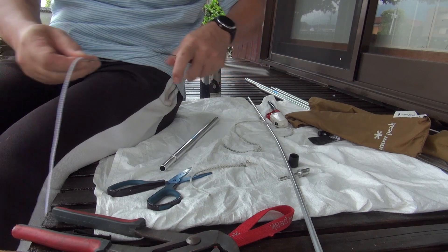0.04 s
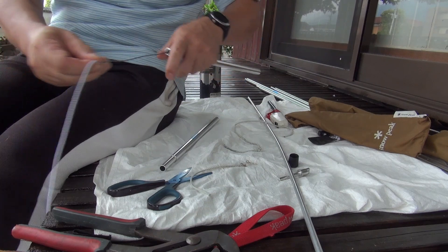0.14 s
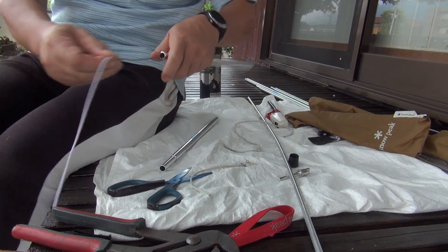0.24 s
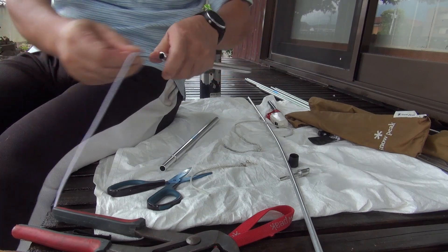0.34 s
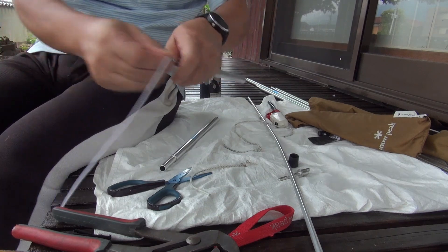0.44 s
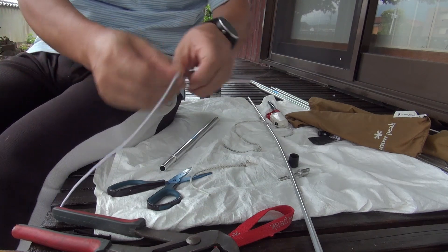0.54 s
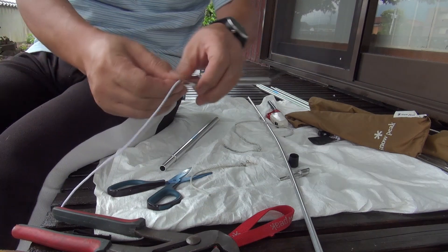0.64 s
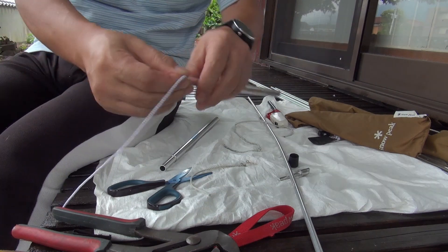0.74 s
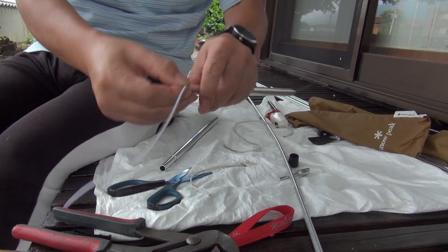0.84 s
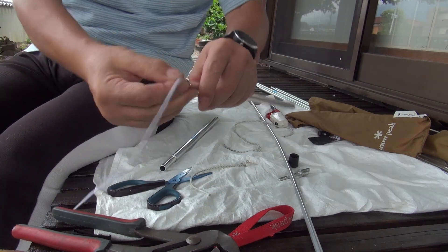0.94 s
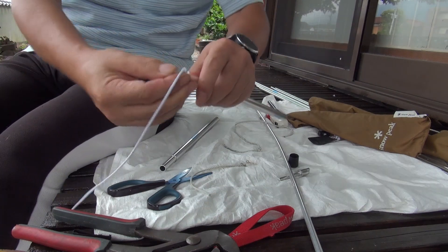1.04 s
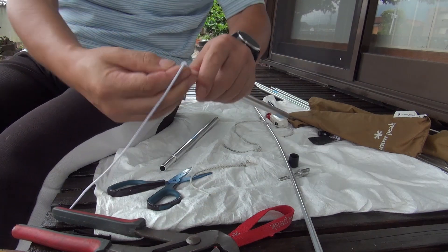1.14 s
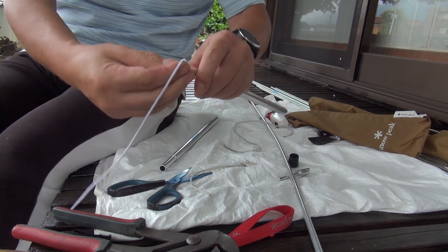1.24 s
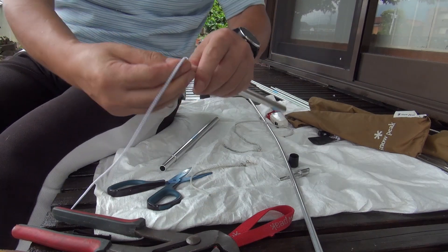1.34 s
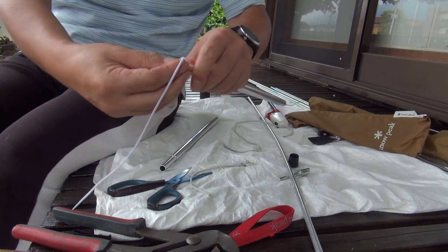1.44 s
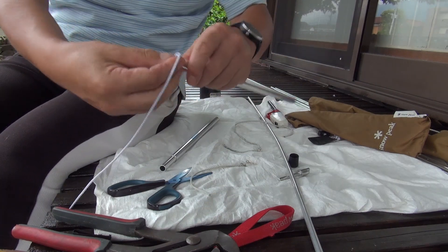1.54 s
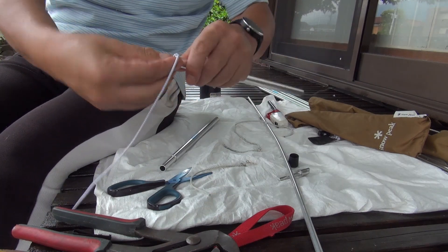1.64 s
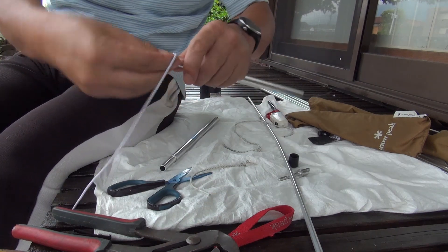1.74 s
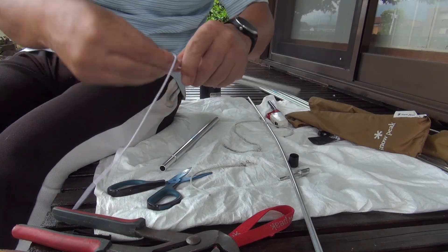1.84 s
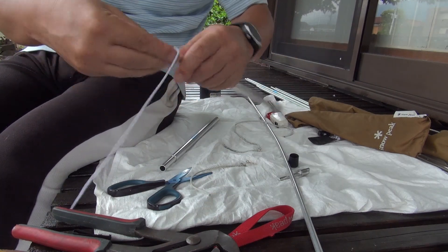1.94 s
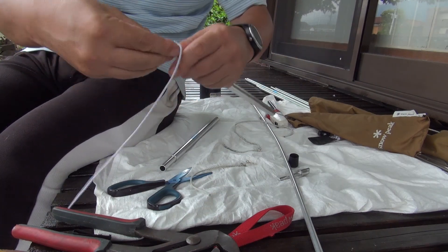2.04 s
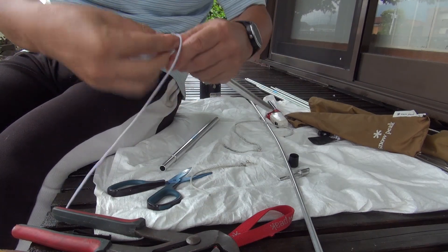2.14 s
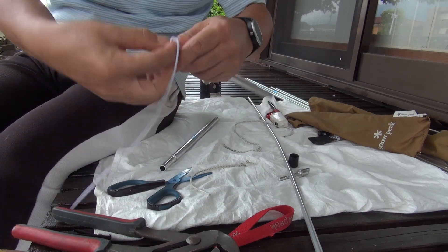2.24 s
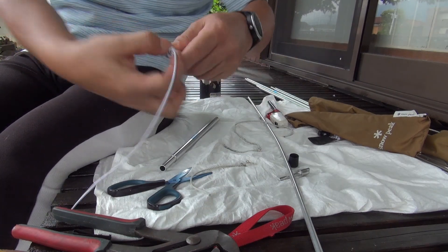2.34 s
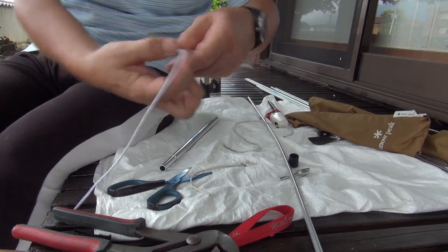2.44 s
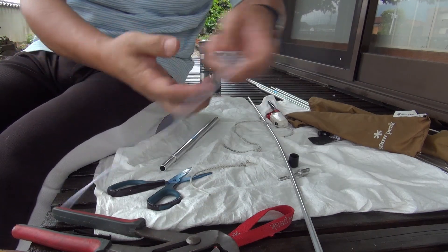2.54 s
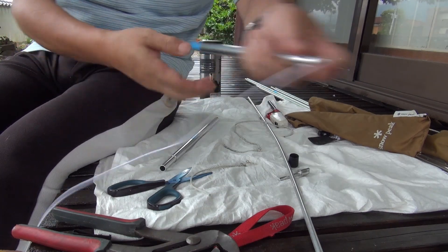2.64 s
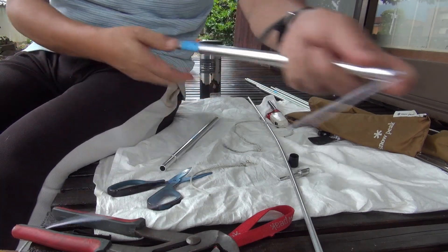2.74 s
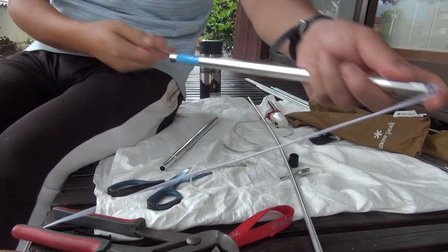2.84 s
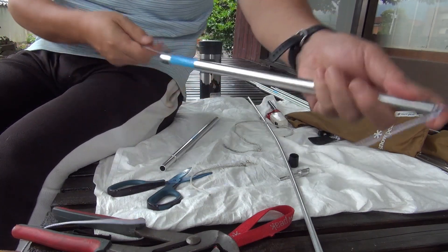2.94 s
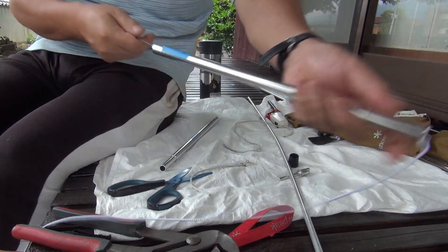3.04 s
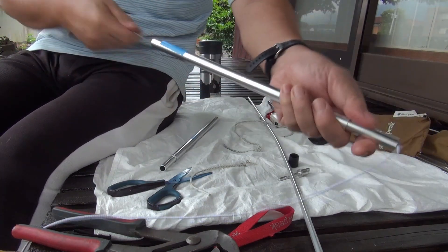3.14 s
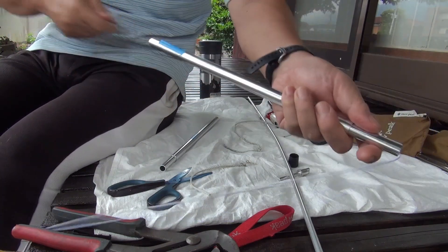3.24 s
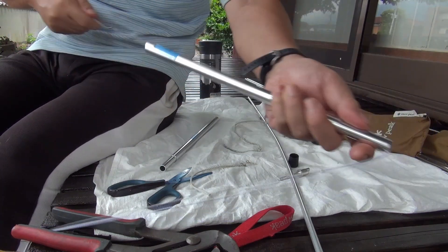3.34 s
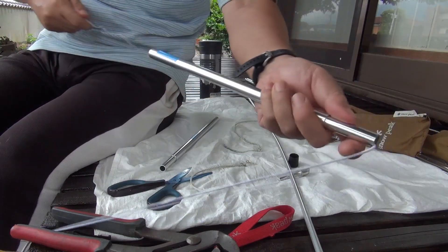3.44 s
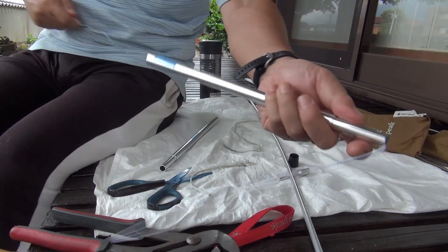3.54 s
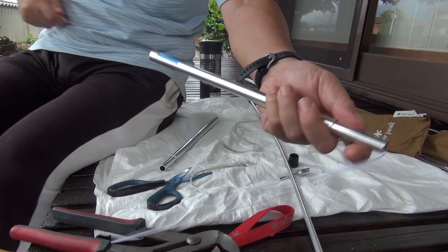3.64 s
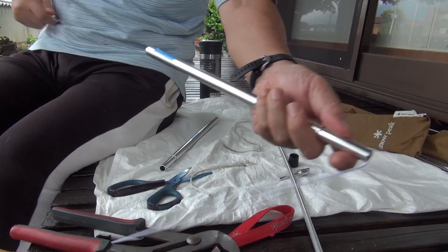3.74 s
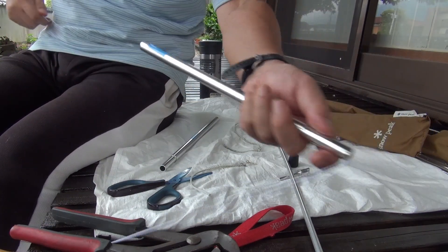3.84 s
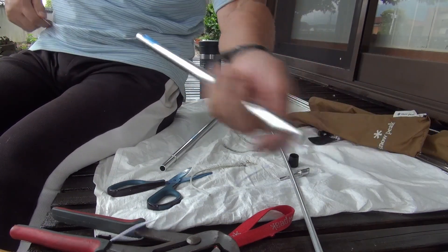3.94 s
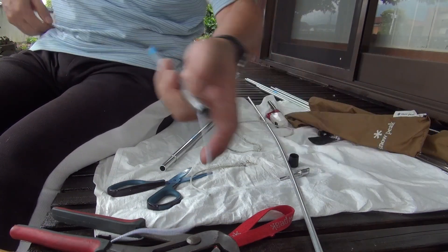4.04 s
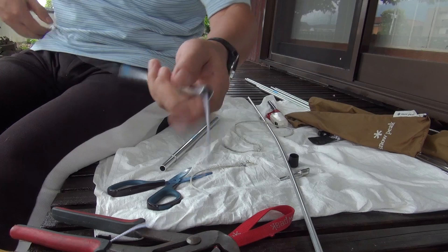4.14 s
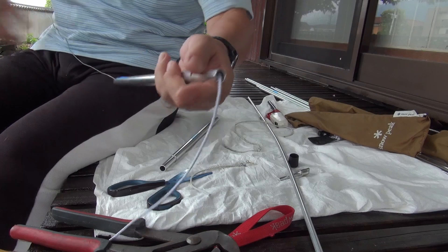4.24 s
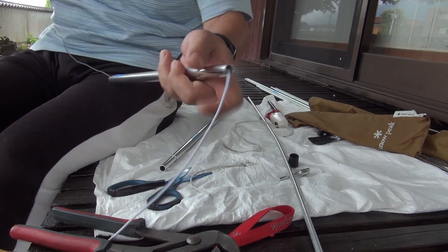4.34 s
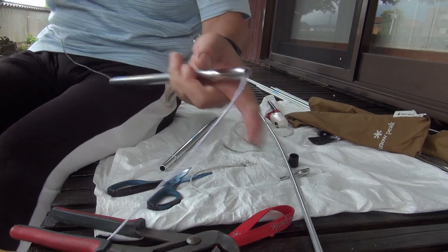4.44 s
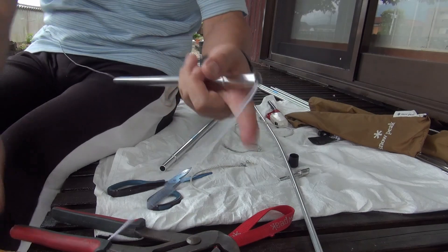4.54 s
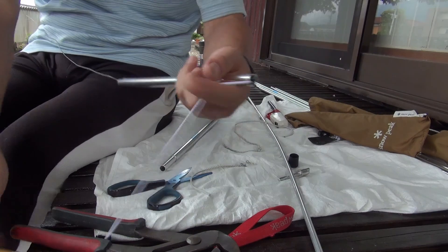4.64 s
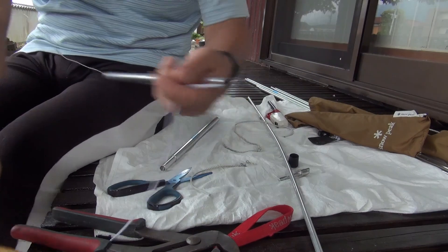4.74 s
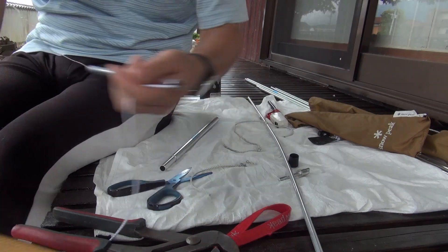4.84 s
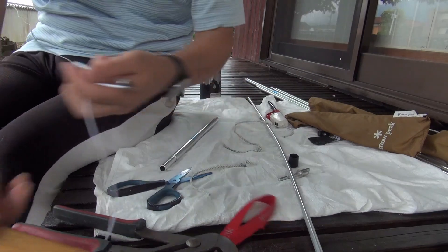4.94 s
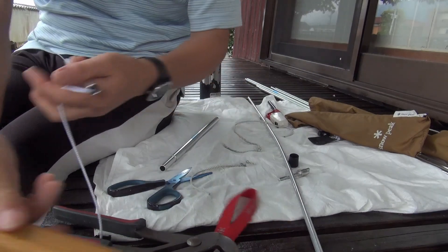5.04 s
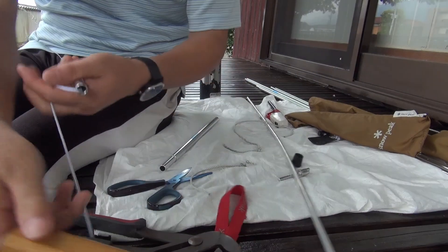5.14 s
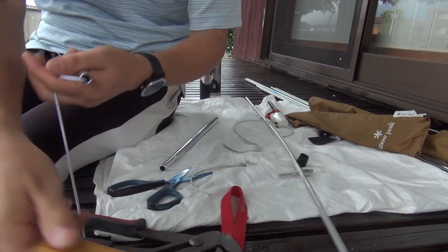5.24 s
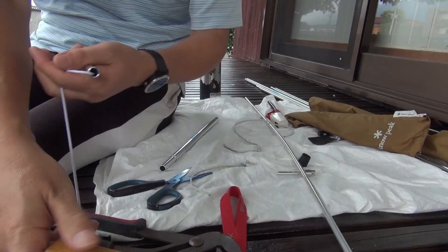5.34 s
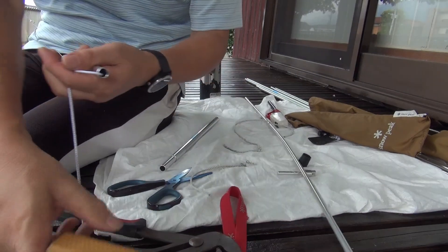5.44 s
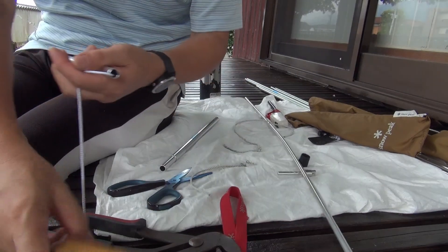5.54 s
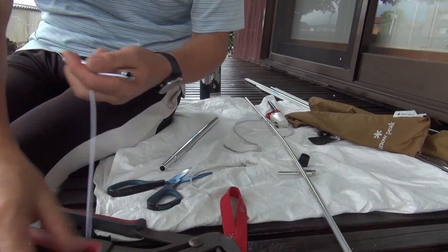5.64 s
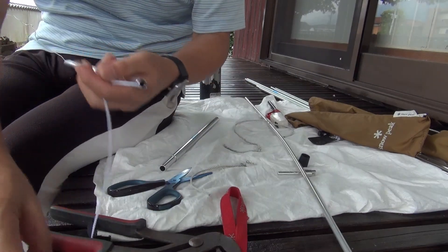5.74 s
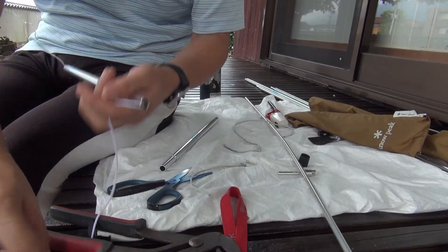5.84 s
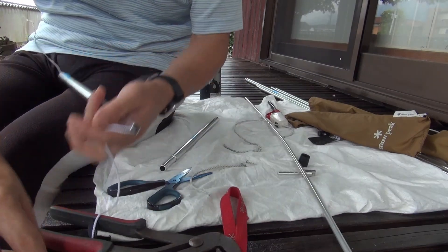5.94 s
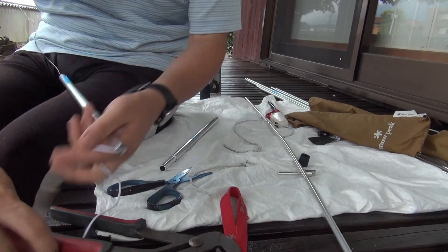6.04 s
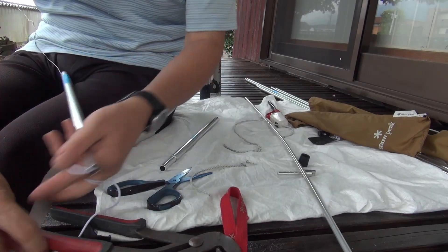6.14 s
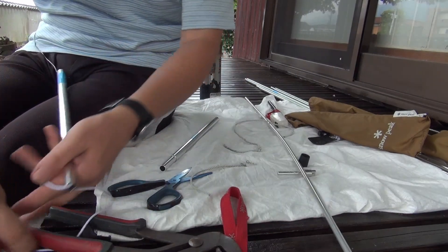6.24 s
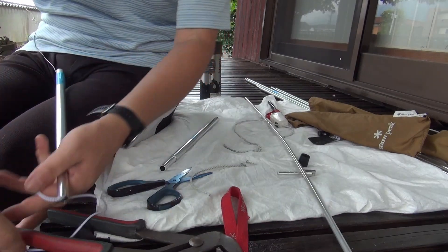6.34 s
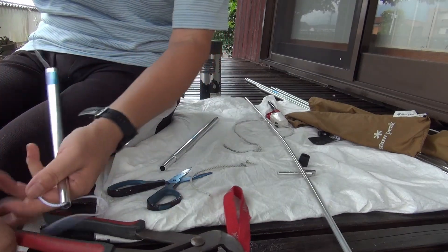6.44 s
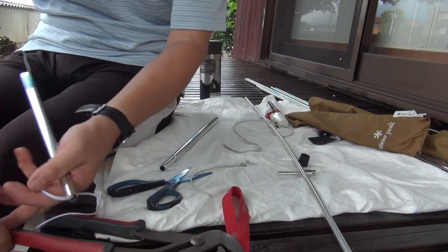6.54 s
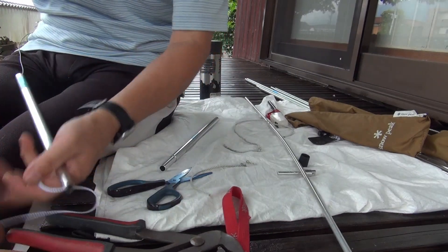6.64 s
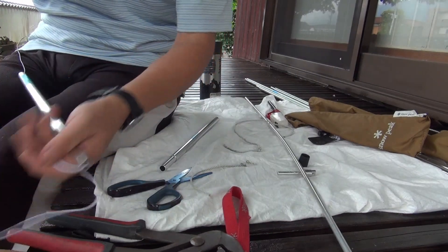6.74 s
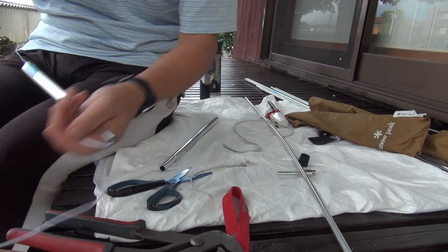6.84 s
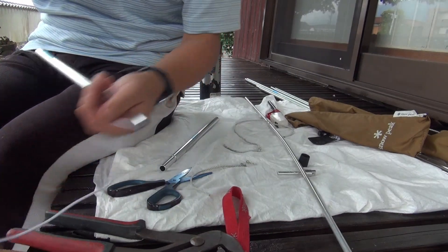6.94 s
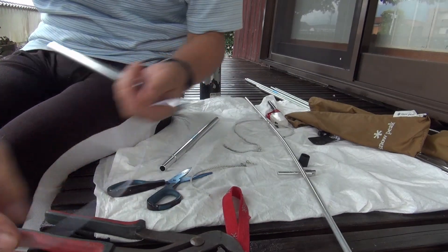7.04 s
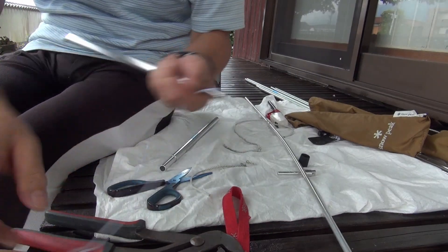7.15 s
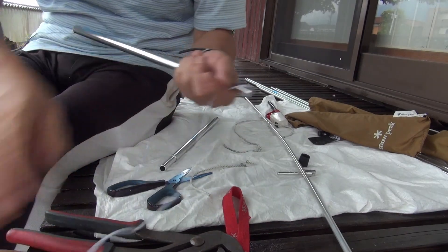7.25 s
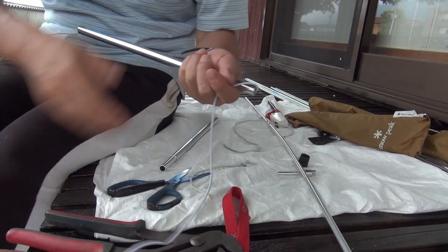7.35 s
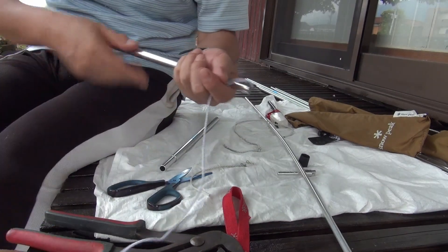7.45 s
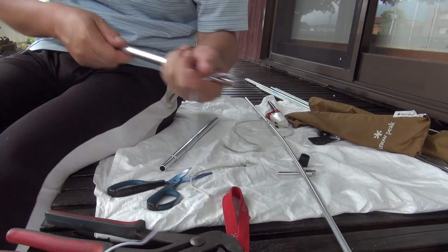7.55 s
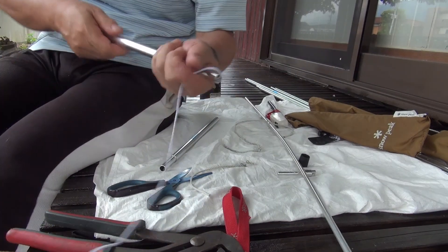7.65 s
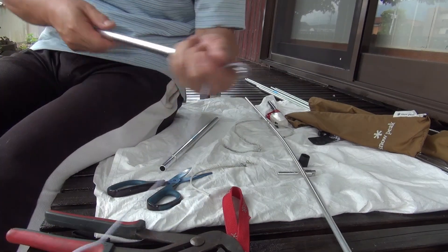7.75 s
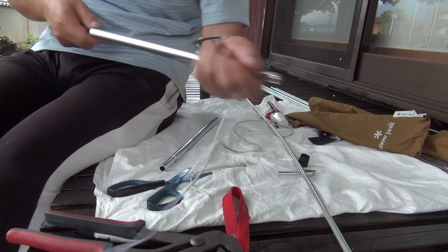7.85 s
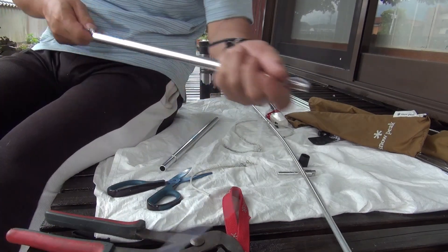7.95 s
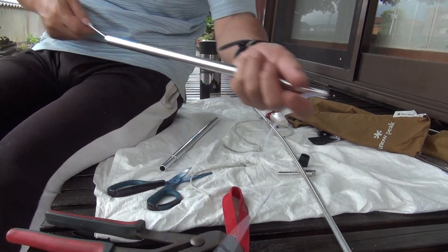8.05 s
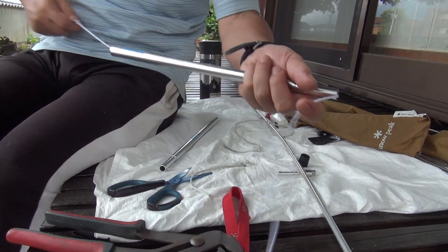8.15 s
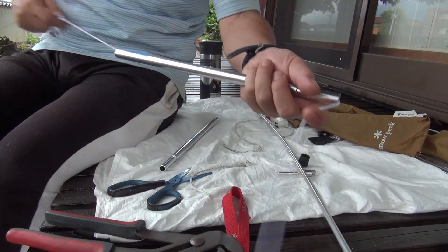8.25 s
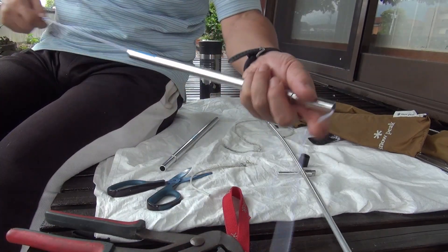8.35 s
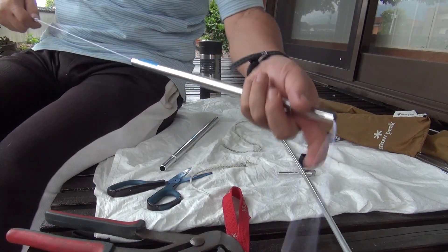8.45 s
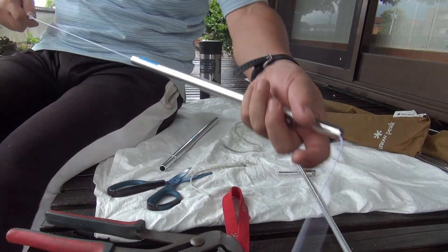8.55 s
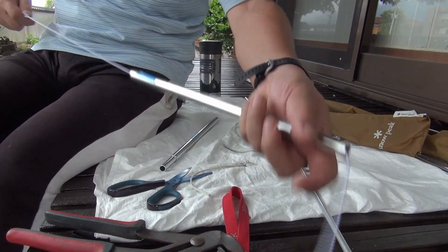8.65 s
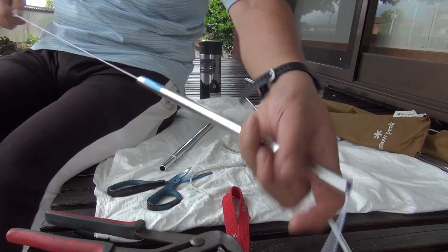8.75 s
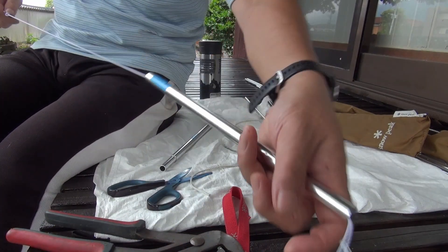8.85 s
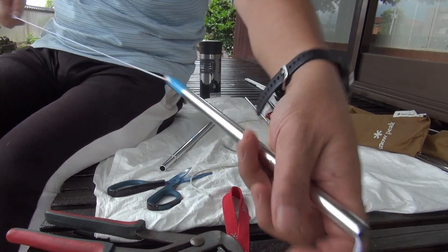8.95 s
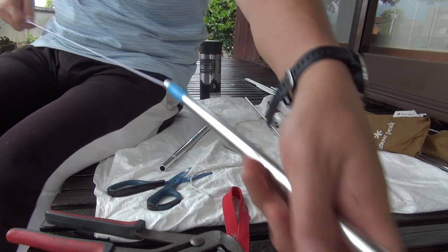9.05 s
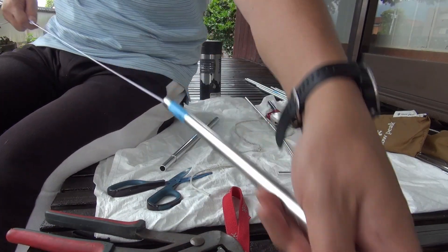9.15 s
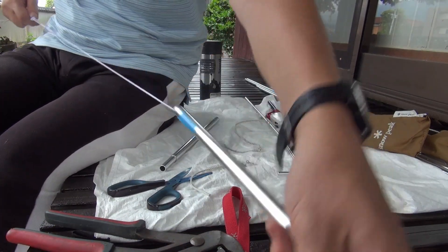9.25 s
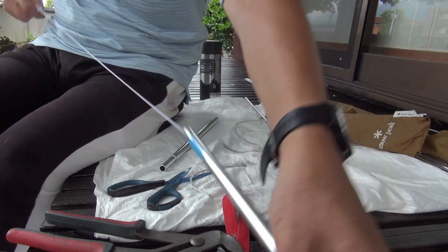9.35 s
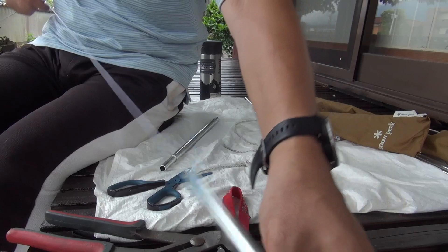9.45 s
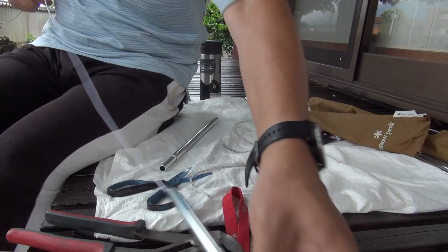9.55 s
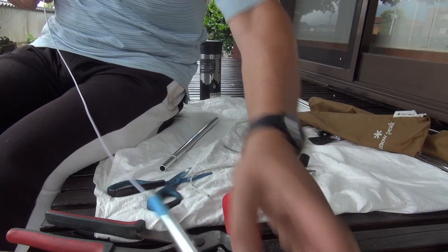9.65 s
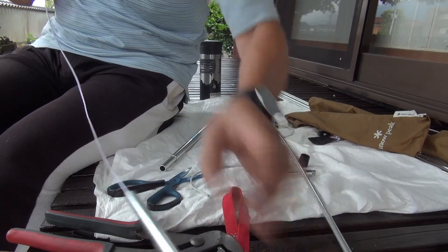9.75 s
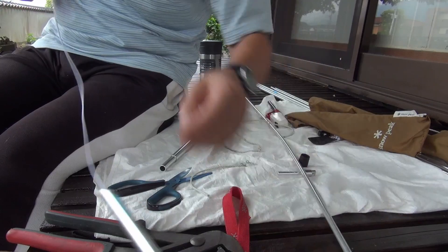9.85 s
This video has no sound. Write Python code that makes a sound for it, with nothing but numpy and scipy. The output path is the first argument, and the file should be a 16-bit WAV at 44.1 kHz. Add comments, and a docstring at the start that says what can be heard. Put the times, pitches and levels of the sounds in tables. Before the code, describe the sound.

Steady bright insect hiss with a faint cricket and low distant motor hum. Close by, cord flicks lightly against a thin aluminium tube, then a quiet gap, short metallic rasps and taps, a rummage of board knocks and steel tool rattle, more small ticks, and finally the tube is laid on the wooden porch with ringing clinks and a hollow pop. Close stereo microphone near the floor, outdoors.

```python
"""On a wooden porch, thin aluminium pole sections are handled: friction of a wire and cord in a tube
feeds its modes; taps, clinks and air pops ring as damped modes. Knocks and a roll of tape dragged over
the boards excite floor resonances and jolt steel tools. In the garden an insect chorus hisses and air
rumbles as shaped noise, over a far street; a cricket chirps and a far motor hums as sines."""
import sys
import numpy as np
from scipy import signal
from scipy.fft import rfft, irfft, next_fast_len
from scipy.io import wavfile
from scipy.ndimage import uniform_filter1d, map_coordinates

SR = 44100
rng = np.random.default_rng(int(sys.argv[2]) if len(sys.argv) > 2 else 0)


def put_to_file(sound):
    """Save the sound as 16-bit audio at rate SR, in the file named by the first command-line argument."""
    columns = np.atleast_2d(sound).T  # one column per channel
    safe = np.clip(columns, -1, 1)
    whole_steps = np.round(safe * 32767)
    wavfile.write(sys.argv[1], SR, whole_steps.astype(np.int16))


N = 437031

# Far motor: t/s, first order level/dB, second order level/dB
MOTOR_ORDERS = [(0.0, -55, -75), (0.2, -60, -59), (0.28, -53, -91), (0.55, -56.5, -57.5),
                (1.55, -69, -62.5), (1.59, -63, -84), (1.86, -57.5, -64), (2.63, -58.5, -61),
                (2.79, -55.5, -84), (2.88, -54, -58), (2.91, -61, -88), (3.53, -51.5, -61),
                (4.46, -53, -68.5), (4.75, -62, -54)]
# Insect chorus spectrum: f/Hz, relative density level/dB
INSECT_SPECTRUM = [(1000, -55), (1700, -24), (2060, -19.5), (2260, -9.5), (2630, -7.5), (3060, -0.5),
                   (3910, 0), (4230, -2), (5410, -3), (6290, -2), (6800, -3), (8040, -1.5), (9200, -2.5),
                   (10800, -15), (11300, -26), (14700, -58), (22000, -120)]
# Narrow bands of single singers: f/Hz, width/Hz, relative level/dB before halving the amplitude
SINGER_BANDS = [(2334, 29, 6), (2800, 64, -1.5), (3500, 52, -12), (4575, 43, 7.5), (6340, 36, 2.5),
                (7800, 150, -10)]
# Air rumble spectrum: f/Hz, relative density level/dB
AIR_SPECTRUM = [(8.8, -53), (15, -19), (54, 3), (75, 1.5), (139, -11), (160, -8), (210, -13.5), (350, -120)]
# Air rumble course: t/s, level/dB before its random swell
AIR_LEVEL = [(0.0, -61), (0.11, -46), (0.61, -61), (0.91, -50.5), (1.1, -60.5), (3.31, -63), (3.97, -49),
             (4.25, -64), (4.47, -53.5), (7.91, -57), (8.11, -48), (9.02, -74), (9.37, -56.5), (9.9, -55)]
# Far street spectrum: f/Hz, relative density level/dB
STREET_SPECTRUM = [(59, -55), (100, -3), (168, -7), (949, -17), (1140, -18), (2200, -16.5), (2860, -35),
                   (4840, -120)]
# Far street course: t/s, level/dB
STREET_LEVEL = [(0, -57), (1.2, -59), (3, -57.5), (4, -57), (6, -55), (8, -57.5), (9.91, -56.5)]
# Correlation of the ears in diffuse noise: f/Hz, left-right likeness [0 to 1]
EAR_LIKENESS = [(60, 1), (130, 0.82), (270, 0.83), (560, 0.62), (1170, 0.72), (2460, 0.96), (5170, 0.87),
                (10900, 0.56)]
# Balance of diffuse noise: f/Hz, left minus right level/dB
EAR_BALANCE = [(60, 1.5), (110, 1.5), (190, 1.5), (340, 3), (600, -0.5), (1080, 0), (1920, -7),
               (3420, -1.5), (6100, 0.5), (10900, 0.0)]
# Cricket course: t/s, level/dB before random strength
CRICKET_LEVEL = [(0, -64), (1.5, -59), (2.05, -56), (2.55, -51), (2.95, -61), (4.8, -61.5), (7.5, -56),
                 (9.91, -70)]
# Jolted tools: t/s, peak level/dB, rattle t60/s, tilt/dB per octave, ring level/dB, left minus right/dB
TOOL_JOLTS = [(5.1255, -15.5, 0.17, -1, -7.5, -3), (5.2314, -27.5, 0.3, -8.5, -29, -5),
              (5.2759, -14, 0.15, -0.5, -7, -3), (5.8128, -29, 0.21, -8, -29, -9)]
# Tool rattle spectrum: f/Hz, relative density level/dB
RATTLE_SPECTRUM = [(530, -65), (900, -44), (1300, -11), (1450, -16), (2100, -5), (2740, -5), (3380, -1.5),
                   (5390, -1), (5990, 2), (11300, 4), (14700, -17), (22000, -120)]
# Modes of the steel tools: mean f/Hz, relative level/dB
STEEL_MODES = [(4400, -7), (6000, -14), (6900, -4), (7900, -4), (8600, -2.5), (9450, -3), (10400, -16),
               (10920, 4.5)]
# Modes of the floor boards: f/Hz, relative level/dB, t60/s
BOARD_MODES = [(119, -3.5, 0.08), (226, -2, 0.12), (270.6, -3.5, 0.32), (336.4, -3, 0.11), (433, -1, 0.16),
               (484, 1, 0.19), (586, -5, .13), (644, -13.5, 0.04), (773, -10, 0.069), (822, -3, 0.19),
               (892, -6, 0.19), (1073, -8, 0.16), (1164, -4.5, 0.13), (1265, -2.5, 0.078),
               (1724, -9, 0.096), (2053, -14.5, 0.14)]
# Knocks on the boards: t/s, peak level/dB, tilt/dB per octave, hardness (lift of upper modes)/dB
BOARD_KNOCKS = [(1.99, -46, 5, 1), (3.566, -22.5, 7.5, -29), (4.672, -40, -21, -10),
                (4.739, -35.5, -11, -3), (4.9, -31.5, -5, 0), (5.069, -30, -8, -6), (5.128, -29.5, 17, -4),
                (5.196, -32, -6, -8), (5.276, -28.5, 4.5, -1), (5.721, -17, 2, -6.5),
                (5.817, -27.5, 3, -34), (6.036, -30, -9, -15), (6.119, -34.5, 7, -27),
                (6.197, -41.5, 10, -22), (6.85, -40.5, -3.5, 7), (8.48, -57, -5, 7), (8.946, -48, -9, 0),
                (9.256, -52, 0, 0), (9.431, -24.5, 3.5, -8), (9.446, -23, 5, 6)]
# Things pushed over the boards: t/s, hold/s, fade t60/s, rumble level/dB, rustle level/dB
BOARD_SHOVES = [(4.745, 0.37, 0.19, -42.5, -52), (5.125, 0.17, 0.32, -41, -45.5),
                (3.596, 0.078, 0.75, -48, -49), (5.717, .03, 1.6, -43.5, -45.5),
                (6.038, .01, 1.13, -46.5, -54), (8.462, .02, 0.55, -52.5, -51.5),
                (8.902, .02, 0.81, -61, -50.5), (9.244, 0.027, 0.2, -52, -59),
                (9.391, 0.069, 0.56, -43.5, -36.5), (9.585, 0.037, 1.34, -45, -52)]
# Modes of a small metal fitting: f/Hz, relative level/dB, t60/s
FITTING_MODES = [(1365, -3, 0.092), (1550, 3, 0.087), (1770, 1, .08)]
# Ticks of the fitting: t/s, peak level/dB
FITTING_TICKS = [(5.471, -46), (5.932, -40), (6.0375, -35), (6.114, -41)]
# Air column, both ends open: f/Hz, width/Hz, relative level/dB
OPEN_COLUMN = [(478, 36, 0), (1020, 29, -6), (1470, 50, 1), (1910, 45, -2), (2370, 38, -5), (3040, 61, -3)]
# Cord running freely through the bore: t/s, hold/s, fade t60/s, level/dB
CORD_HUMS = [(6.27, 0.16, 0.45, -59), (8.797, 0.35, 0.56, -56)]
# Cord patting the open tube: t/s, peak level/dB
CORD_PATS = [(6.267, -44), (6.3, -43), (6.3374, -38.5), (6.388, -45), (6.478, -46)]
# Short slides of the cord: t/s, hold/s, fade t60/s, level/dB, tilt/dB per octave
CORD_FLICKS = [(0.0, .005, 0.14, -36, 6), (.05, .02, .3, -50, 1), (0.161, 0.018, 0.27, -46.5, 5.5),
               (0.275, 0.012, .2, -44.5, 4), (0.376, .015, .2, -47, 2), (0.438, 0.023, 0.22, -49, -1),
               (3.43, .03, 0.2, -41, 1), (3.999, 0.0065, 0.092, -48.5, -9), (7.892, 0.0084, .06, -47, -4),
               (7.973, 0.22, 0.55, -60.5, -7)]
# Two long pulls of the wire, each with rows: t/s, level/dB, tilt/dB per octave before limiting
WIRE_PULLS = [
    [(3.13, -72, 3), (3.158, -39, 4.5), (3.195, -39, -3.5), (3.22, -36.5, 24), (3.255, -37.5, 1),
     (3.31, -37.5, 6), (3.35, -48.5, -8), (3.4, -59, -11)],
    [(3.52, -52, -4), (3.54, -39, 3), (3.56, -40.5, 1), (3.59, -37.5, 5), (3.64, -42.5, 4),
     (3.74, -47.5, -0.5), (3.79, -66, -2)],
]
# Modes of the hand-held tube: f/Hz, width/Hz, relative level/dB
HELD_MODES = [(1666, 590, -10.5), (3114, 340, -2.5), (5003, 370, 0), (7320, 620, 1.5), (8700, 180, -10.5),
              (9810, 800, -3.5), (10760, 470, -13)]
# Taps on the held tube: t/s, peak level/dB, brightest f/Hz, fall away from it/dB per octave, t60/s
TUBE_TAPS = [(.005, -18.5, 9000, 8, 0.023), (3.144, -22, 10000, 18, .012), (3.359, -18, 9100, 9, 0.015),
             (3.36, -13.5, 4600, 6.5, 0.025), (3.577, -24, 3080, 14, 0.033),
             (3.6855, -18.5, 5970, 19, 0.015), (3.984, -20, 4700, 9, .03), (3.988, -23, 7300, 8, .04),
             (4.006, -25, 5500, 6, 0.025), (4.031, -26, 5500, 6, 0.02), (5.813, -21.5, 4700, 9, 0.035),
             (6.9205, -16, 10200, 13, 0.012), (6.926, -19, 9900, 10, 0.06), (7.876, -29, 3100, 18, .015),
             (7.885, -29, 3500, 18, .025), (7.891, -21, 3200, 18, .02), (7.899, -21, 3100, 15, 0.04),
             (7.8995, -26, 8500, 5, .02), (9.43, -23, 7400, 2, 0.034)]
# Modes of the free tube: f/Hz, relative level/dB, share of ring time, share of bending, loss at touch/dB
FREE_MODES = [(476, -8, 1.3, 0.65, 5), (1275, -6, 1.3, 0.96, 15), (1720, -3, 1, 0.3, 1),
              (2726, 6, 0.082, .5, 9), (3185, -1.5, 1.2, -.3, 14), (5138, 1, 0.35, 0.1, 0),
              (5200, -3, 1.5, .25, 1), (7465, -6.5, 0.6, -.1, 6), (9670, -14, 0.43, 0, 0)]
# Tube laid down: t/s, peak level/dB, bending/dB, t60/s before shares, time to next touch/s, contact/dB
TUBE_CLINKS = [(9.535, -9, -24, 0.27, 0.027, 15), (9.583, -9.5, 13, 0.3, 0.073, 19),
               (9.597, -19, 10, 0.1, 0.056, 12), (9.606, -23, -8, 0.4, .047, -6),
               (9.891, -26, -4, 0.058, 0.04, 12)]
# Air column, one end shut: f/Hz, relative level/dB, t60/s
SHUT_COLUMN = [(468, -5, .06), (1435, 0, .05), (2300, -18, .04), (4850, -12, .08), (7650, -17, .06)]
# Pops of that air column: t/s, peak level/dB, lift of the lowest tone/dB
AIR_POPS = [(3.533, -32.5, -10), (6.8655, -34.5, 1), (8.792, -44.5, -8), (8.902, -39, -3), (9.381, -25, 7),
            (9.3892, -16, 0), (9.3946, -18.5, 0), (9.4586, -28, -1)]

INSECTS_DB = -40
MOTOR_HZ = 85.9  # mean pitch of the first order
CHIRP_HZ, CHIRP_EVERY_S = 2310, .2167
CHIRP_FIRST_S, CHIRP_S = 0.1, .03  # middle of the first chirp; half length, where a chirp is at 1/e
GLIDE_S, GLIDE_HOLD_S, GLIDE_DB = 8.1, .16, -59
GLIDE_FROM_HZ, GLIDE_TO_HZ, GLIDE_MID_S, GLIDE_SPAN_S = 2350, 1680, 8.165, .03
SQUEAK_S, SQUEAK_HOLD_S, SQUEAK_T60, SQUEAK_DB = 3.392, 0.018, 0.1, -33
SQUEAK_HZ, SQUEAK_BEND_HZ_PER_S2 = 9800, 670000  # starting pitch and its quadratic climb
PAT_T60 = 0.038  # s
TOP_HZ = 11050  # upper band limit


def amp(db):
    """Definition of level: the amplitude gain of a value in dB."""
    return 10 ** (np.asarray(db) / 20)


def unit(x):
    """Normalization of power: scaled to rms 1."""
    return x / np.sqrt(np.mean(x ** 2) + 1e-20)


def along(points, hz):
    """Logarithmic frequency scale: (f, value) points joined by lines."""
    f, v = np.transpose(points)
    return np.interp(np.log(hz + 1), np.log(f + 1), v)


def curves(rows, rest=-120):
    s, *cols = np.transpose(rows)
    return [np.interp(np.arange(N) / SR, s, c, rest, rest) for c in cols]


def wobble(rate):
    """Slow random fluctuation: a smooth curve with rate knots a second."""
    knots = rng.standard_normal(int(N * rate / SR) + 4)
    return map_coordinates(knots, [np.arange(N) * rate / SR])


def filtered(x, response):
    """Linear filtering: the spectrum times a response of frequency."""
    n = x.shape[-1]
    m = next_fast_len(n + 8192)
    return irfft(rfft(x, m) * response(np.fft.rfftfreq(m, 1 / SR)), m)[..., :n]


def resonances(peaks, f):
    """Superposition of causal resonances (f, width, dB) with alternating sign."""
    total = 0
    for k, (centre, width, db) in enumerate(peaks):
        damping = 1j * f * width
        total = total + (-1) ** k * amp(db) * damping / (centre * centre - f * f + damping)
    return total


def rush(gain, patchy_db):
    """Diffuse field: partly correlated stereo noise, in patches of random gain, of mid rms 1."""
    z = signal.stft(rng.standard_normal((2, N + 512)), nperseg=512)[2]
    field = uniform_filter1d(rng.standard_normal(z.shape[1:]), size=5, axis=0)
    field = uniform_filter1d(field, size=10, axis=1)
    pair = signal.istft(z * amp(patchy_db * unit(field)), nperseg=512)[1][:, :N]
    # This angle between mid and side gives the wanted correlation of the ears
    turn = lambda hz: np.arccos(np.clip(along(EAR_LIKENESS, hz), 0, 1)) / 2
    mid, side = filtered(pair, lambda hz: gain(hz) * [np.cos(turn(hz)), np.sin(turn(hz))])
    ears = np.array([mid + side, mid - side])
    both = filtered(ears, lambda hz: amp(along(EAR_BALANCE, hz) * [[.5], [-.5]]))
    return both / np.sqrt(np.mean(both.mean(axis=0) ** 2))


def grit(spiky_db):
    """Stick-slip friction: noise whose size jumps from slip to slip."""
    return unit(rng.standard_normal(N) * amp(spiky_db * wobble(250)))


def stroke(s, hold, t60, rise_db_per_s):
    """Envelope of one movement in dB: rises to 0 at s, holds, decays exponentially."""
    t = np.arange(N) / SR - s
    return rise_db_per_s * np.minimum(t, 0) - 60 * np.maximum(t - hold, 0) / t60


def ring(modes_db, hz, t60, attack, spread_db, rough_db=3.5):
    """Modal decay: damped sines, each at a random strength and with a randomly trembling level."""
    t = np.arange(SR // 3)[:, None] / SR
    tremble = unit(uniform_filter1d(rng.standard_normal((len(t), len(hz))), size=250, axis=0))
    level = modes_db + spread_db * rng.standard_normal(len(hz)) + rough_db * tremble
    modes = amp(level - 60 * t / t60) * np.sin(2 * np.pi * hz * t)
    return (modes * (1 - np.exp(-t / attack))).sum(axis=1)


def add(mix, s, sound, db, pan_db):
    """Superposition: a sound placed at s with peak db, split left minus right by pan_db."""
    part = mix[:, round(s * SR):][:, :len(sound)]
    part += amp(db + pan_db * np.array([[.5], [-.5]])) * sound[:part.shape[1]] / np.abs(sound).max()


def air_rumble():
    """Low-frequency noise: light air as diffuse noise with a randomly swelling level."""
    level_db, = curves(AIR_LEVEL, rest=None)
    swell = amp(2.6 * wobble(4.5))
    return amp(level_db) * swell * rush(lambda f: amp(along(AIR_SPECTRUM, f)), patchy_db=-1.2)


def far_street():
    """Incoherent summation: a far street heard as diffuse shaped noise."""
    level_db, = curves(STREET_LEVEL, rest=None)
    return amp(level_db) * rush(lambda f: amp(along(STREET_SPECTRUM, f)), patchy_db=2.5)


def motor():
    """Harmonic radiation: two orders share one slightly wandering phase."""
    first_db, second_db = curves(MOTOR_ORDERS)
    turn = 2 * np.pi * np.cumsum(MOTOR_HZ + 0.373 * wobble(1.283)) / SR
    return np.sqrt(2) * (amp(first_db) * np.sin(turn) + amp(second_db) * np.sin(2 * turn))


def insect_chorus():
    """Incoherent summation: many singers merge into noise, with narrow bands standing out."""
    singers = lambda f: 1 + .5 * np.abs(resonances(SINGER_BANDS, f))
    return amp(INSECTS_DB) * rush(lambda f: amp(along(INSECT_SPECTRUM, f)) * singers(f), patchy_db=1.08)


def cricket():
    """Amplitude modulation: a nearly steady tone in evenly spaced pulses of varying strength."""
    t = np.arange(N) / SR
    beat = (t - CHIRP_FIRST_S) / CHIRP_EVERY_S
    shape = np.exp(-((beat - np.round(beat)) * CHIRP_EVERY_S / CHIRP_S) ** 2)
    level_db, = curves(CRICKET_LEVEL, rest=None)
    strength = amp(level_db + 2.2 * wobble(12.0) + 2.8 * wobble(60))
    tone = np.sin(2 * np.pi * np.cumsum(CHIRP_HZ + 25 * wobble(40)) / SR)
    return np.sqrt(2) * strength * shape * tone


def wall(x):
    """Diffuse reflection: house wall and roof answer with a short tail, partly different in each ear."""
    t = np.arange(SR // 4) / SR
    both, apart = rng.standard_normal((2, len(t)))
    tail = (both + 0.5 * apart * [[1], [-1]]) * amp(-60 * t / 0.12) * (t > .004)
    return signal.fftconvolve(x, tail / np.linalg.norm(tail[0]), axes=1)[:, :N]


def tools():
    """Impact excitation: jolts give bright bursts of rattle and leave the steel ringing."""
    mix = np.zeros((2, N))
    t = np.arange(SR // 3) / SR
    hz, db = np.transpose(STEEL_MODES)
    crackle = grit(spiky_db=1.0)
    for s, peak_db, t60, tilt_db, ring_db, pan_db in TOOL_JOLTS:
        colour = lambda f: amp(along(RATTLE_SPECTRUM, f) + tilt_db * np.log2((f + 1) / 6000))
        hiss = unit(filtered(crackle[round(s * SR):][:len(t)], colour))
        rattle = hiss * amp(-60 * t / t60) * (1 - np.exp(-t / 0.0068))
        steel_hz = hz * rng.normal(1, 0.0021, len(hz))
        steel = ring(db + ring_db, steel_hz, 0.84 * t60, 0.0022, spread_db=2.0, rough_db=6.5)
        add(mix, s, rattle + steel, peak_db, pan_db)
    return mix


def knocks(wide):
    """Impact on a plate: a hard edge drives the upper board modes, and loose boards shake on."""
    mix = np.zeros((2, N))
    hz, db, t60 = np.transpose(BOARD_MODES)
    t = np.arange(SR // 3) / SR
    for s, peak_db, tilt_db, hard_db in BOARD_KNOCKS:
        hardness = lambda f: hard_db / (1 + (880 / (f + 1)) ** 8)
        lift = lambda f: tilt_db * np.log2(np.clip(f, 80, 3000) / 500) + hardness(f)
        modes = ring(db + lift(hz), hz, t60, .0006, spread_db=2)
        colour = lambda f: resonances(wide, f) * amp(lift(f)) / (1 + (f / 1600) ** 3)
        chatter = unit(filtered(rng.standard_normal(len(t)), colour)) * amp(-60 * t / 0.22)
        add(mix, s, unit(modes) + 2.6 * chatter, peak_db, -1.5)
    return mix


def fitting():
    """Modal decay: a small metal fitting ticks in three damped modes."""
    mix = np.zeros((2, N))
    hz, db, t60 = np.transpose(FITTING_MODES)
    for s, peak_db in FITTING_TICKS:
        add(mix, s, ring(db, hz, t60, 0.0013, spread_db=1.5), peak_db, -6)
    return mix


def dragging(wide):
    """Friction-driven resonance: pushed things make the boards rumble while cloth rustles."""
    low = lambda f: resonances(wide, f) / (1 + (f / 400) ** 4)
    rumble = unit(amp(2.3 * wobble(20)) * filtered(grit(spiky_db=3.0), low))
    high = lambda f: resonances([(1400, 4300, 3.5)] + wide[8:], f)
    rustle = unit(filtered(grit(spiky_db=1.0), high))
    mix = np.zeros((2, N))
    for s, hold, fade, rumble_db, rustle_db in BOARD_SHOVES:
        both = amp(rumble_db) * rumble + amp(rustle_db) * rustle * amp([[-2.5], [2.5]])
        mix += amp(stroke(s, hold, fade, rise_db_per_s=900)) * both
    return mix


def porch():
    """Shared resonator: knocks and dragging excite the same floor boards; a fitting ticks along."""
    wide = [(centre, 4.5 / t60, db) for centre, db, t60 in BOARD_MODES]  # width from decay time
    return knocks(wide) + fitting() + dragging(wide)


def bore():
    """Air-column resonance: the running cord makes the tube hum; once a faint tone slides down."""
    hum = unit(filtered(grit(spiky_db=3.5), lambda f: resonances(OPEN_COLUMN, f)))
    out = hum * sum(amp(db + stroke(s, hold, t60, rise_db_per_s=300)) for s, hold, t60, db in CORD_HUMS)
    down = (1 + np.tanh((np.arange(N) / SR - GLIDE_MID_S) / GLIDE_SPAN_S)) / 2
    hz = GLIDE_FROM_HZ + (GLIDE_TO_HZ - GLIDE_FROM_HZ) * down + 30 * wobble(80)
    db = GLIDE_DB + stroke(GLIDE_S, GLIDE_HOLD_S, .2, rise_db_per_s=600) + 3.1 * wobble(50)
    glide = amp(db) * np.sin(2 * np.pi * np.cumsum(hz) / SR)
    return (out + glide) * amp([[-1.5], [1.5]])


def squeak():
    """Frequency modulation: one rough tone whose pitch climbs ever faster for 0.05 s."""
    since = np.clip(np.arange(N) / SR - SQUEAK_S, 0, .05)
    hz = SQUEAK_HZ + SQUEAK_BEND_HZ_PER_S2 * since ** 2 + 150 * wobble(500)
    envelope_db = stroke(SQUEAK_S, SQUEAK_HOLD_S, SQUEAK_T60, rise_db_per_s=2800)
    db = SQUEAK_DB + envelope_db + 4.2 * wobble(380)
    return amp(db) * np.sin(2 * np.pi * np.cumsum(hz) / SR)


def threading():
    """Stick-slip excitation: wire and cord on the tube wall feed each mode in its own spurts."""
    slips, out = grit(spiky_db=1.2), np.zeros(N)
    moves = [curves(rows) for rows in WIRE_PULLS]
    for s, hold, t60, db, tilt_db in CORD_FLICKS:
        moves.append((db + stroke(s, hold, t60, rise_db_per_s=900), tilt_db))
    for mode in HELD_MODES:
        spurts = amp(2.6 * wobble(35))
        band = unit(spurts * filtered(slips, lambda f: resonances([mode], f) ** 2))
        octaves = np.log2(max(mode[0], 2600) / 6500)
        for db, tilt_db in moves:
            out += band * amp(db + mode[2] + np.clip(tilt_db, -12, 12) * octaves)
    return (out + squeak()) * amp([[-.7], [.7]])


def air_pops():
    """Air-column resonance: pops sound the air in a tube with one end shut."""
    mix = np.zeros((2, N))
    hz, db, t60 = np.transpose(SHUT_COLUMN)
    for s, peak_db, low_db in AIR_POPS:
        add(mix, s, ring(db + (hz == hz[0]) * low_db, hz, t60, 0.00065, spread_db=6.5), peak_db, -5)
    return mix


def cord_pats():
    """Air-column resonance: the cord pats the open tube and sounds its third tone."""
    mix = np.zeros((2, N))
    hz, _, db = np.transpose(OPEN_COLUMN[2:3])
    for s, peak_db in CORD_PATS:
        pat = ring(db, hz * rng.normal(1.01, .01), PAT_T60, .001, spread_db=1, rough_db=5.5)
        add(mix, s, pat, peak_db, -3)
    return mix


def hand_taps():
    """Damping by the hand: the modes of the held tube die at once after each tap."""
    mix = np.zeros((2, N))
    t = np.arange(SR // 3) / SR
    hz, _, db = np.transpose(HELD_MODES)
    for s, peak_db, best_hz, fall_db, t60 in TUBE_TAPS:
        # Where it is held and hit favours one region
        grip = lambda f: -np.abs(fall_db * np.log2((f + 1) / best_hz))
        held_hz = hz * rng.normal(1, 0.0118, len(hz))
        held = ring(db + grip(hz), held_hz, t60, 0.0004, spread_db=1.5)
        colour = lambda f: amp(grip(f)) / (1 + (1200 / (f + 1)) ** 4)
        crack = amp(0.5 - 60 * t / .007) * filtered(rng.standard_normal(len(t)), colour)
        add(mix, s, held + crack, peak_db, -2.1)
    return mix


def clinks():
    """Free vibration: laid on the boards, the tube sings until the next touch takes level away."""
    mix = np.zeros((2, N))
    t = np.arange(SR // 3) / SR
    hz, db, share, bending, lost_db = np.transpose(FREE_MODES)
    for s, peak_db, bending_db, t60, touch, contact_db in TUBE_CLINKS:
        touched = (1 + np.tanh((t[:, None] - touch) / .003)) / 2
        modes_db = db + bending_db * bending - lost_db * touched
        free = ring(modes_db, hz, t60 * share, 0.000096, spread_db=0.9, rough_db=5.0)
        blow = rng.standard_normal(len(t)) * amp(-60 * t / 0.012)
        # The contact itself, dull and short
        crack = filtered(blow, lambda f: resonances([(2730, 3500, contact_db)], f))
        add(mix, s, free + crack, peak_db, -3)
    return mix


def tube():
    """Wall and air vibration: the pole section sounds by its metal and by the air inside."""
    return air_pops() + cord_pats() + hand_taps() + clinks()


def scene():
    """Superposition: garden and handling; the tube has a weaker tail than the other handling sounds."""
    garden = air_rumble() + far_street() + motor() + insect_chorus()
    handling = tools() + porch() + bore() + threading()
    pole = tube()
    return garden + cricket() + wall(amp(-13) * pole + amp(-6) * handling) + handling + pole


def record(dry):
    """Band limitation: a steep low-pass removes what lies above the limit."""
    return filtered(dry, lambda hz: 1 / (1 + (hz / TOP_HZ) ** 300))


dry = scene()
out = record(dry)
put_to_file(out)
```